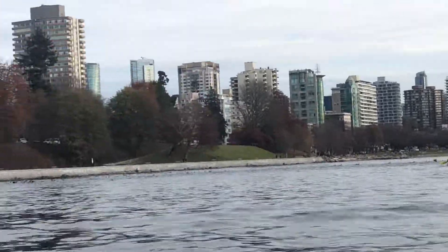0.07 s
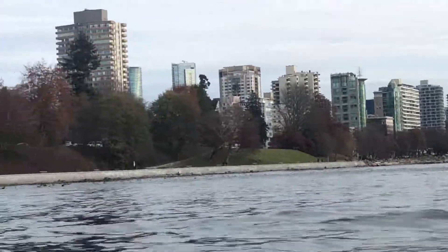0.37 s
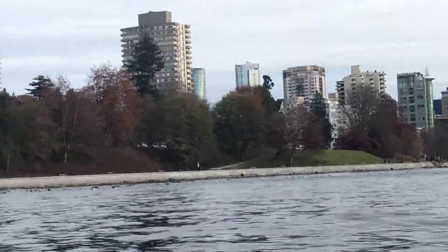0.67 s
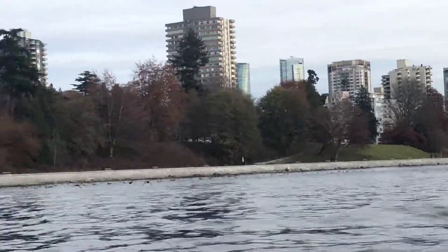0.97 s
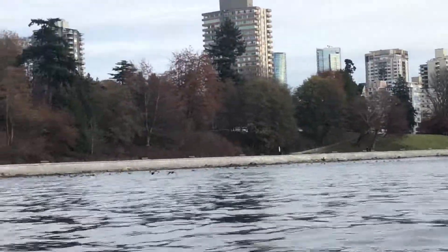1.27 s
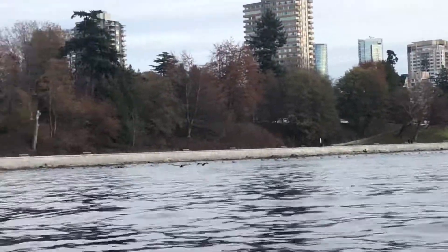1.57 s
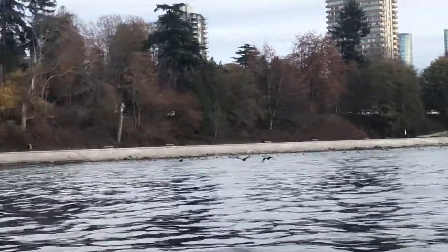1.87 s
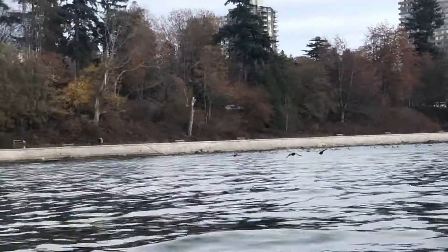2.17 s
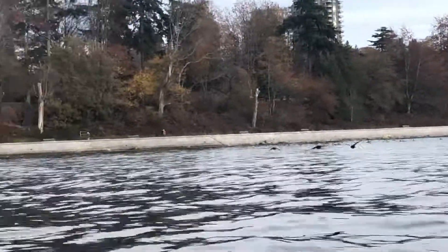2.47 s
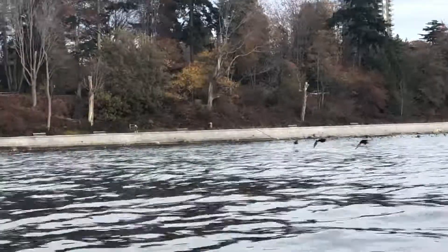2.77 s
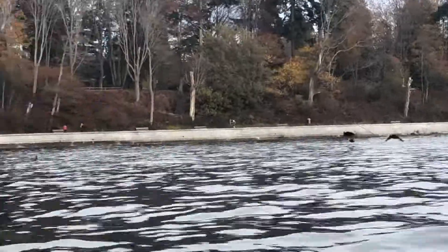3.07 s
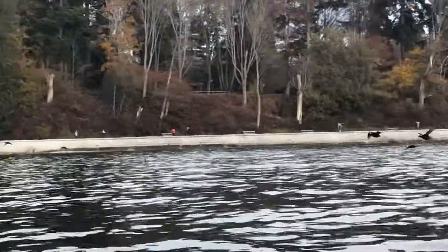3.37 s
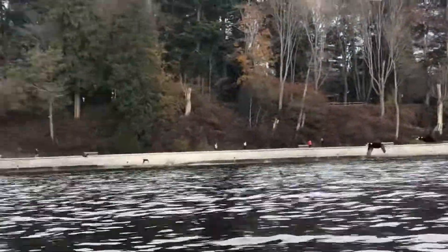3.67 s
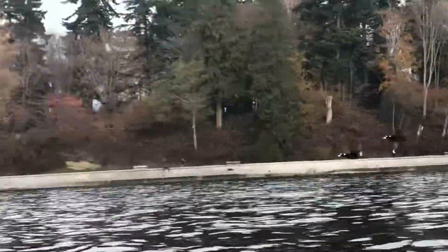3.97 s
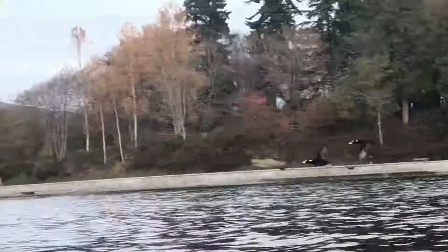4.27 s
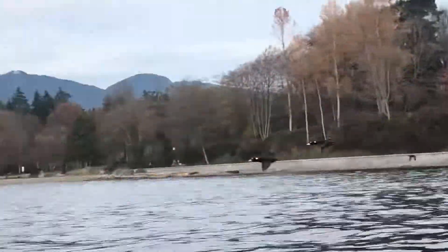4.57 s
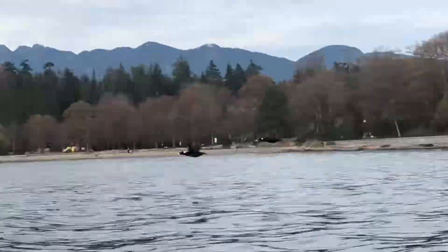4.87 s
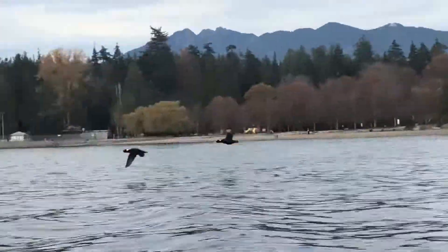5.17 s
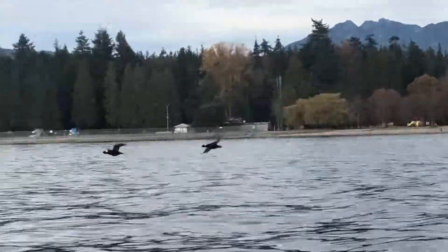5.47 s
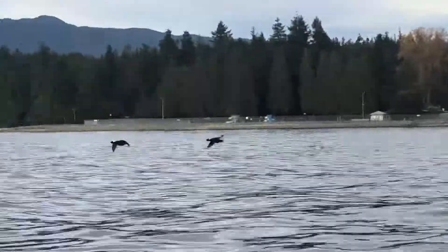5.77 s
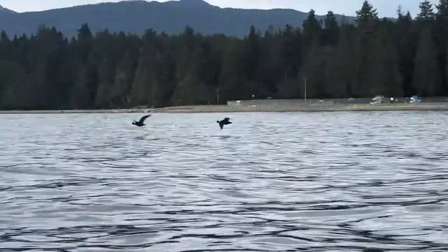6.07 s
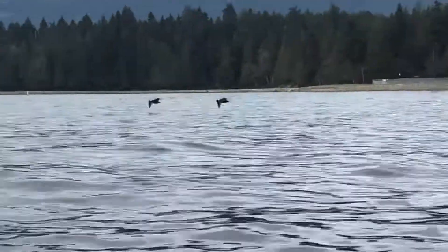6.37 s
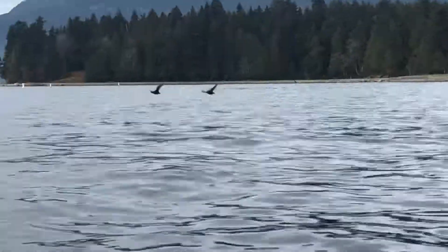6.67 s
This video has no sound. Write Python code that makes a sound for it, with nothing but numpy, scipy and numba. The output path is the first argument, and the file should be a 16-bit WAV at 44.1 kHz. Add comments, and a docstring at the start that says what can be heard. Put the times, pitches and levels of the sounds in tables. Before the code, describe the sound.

Heard from a small boat on open water, a low idling engine throb and rumble run under gentle sloshing waves. At the start come the quick, thin wing whistles of two ducks, the nearer fading first and the fainter one trailing off after it. Hollow gulps and small splashes sound by the hull, then a far motor's steady hum swells. A brief close swish of fabric with a small squeak comes just before the end.

```python
"""Whistling wings and a throbbing engine come first: sea ducks fly low past a small idling boat.
Their feathers whistle on every downstroke and fade away, while the engine slows a little.
A far motor drones in across the bay. Water washes, gulps and ticks near the hull.
Near the end something close by, probably a waterproof sleeve, swishes with a small squeak."""
import sys
import numpy as np
from scipy import signal
from scipy.fft import rfft, irfft
from scipy.io import wavfile
from scipy.ndimage import uniform_filter1d
from numba import njit

SR = 44100
rng = np.random.default_rng(int(sys.argv[2]) if len(sys.argv) > 2 else 0)


def unload_wav(signal):
    """Save mono or channel-first audio to the path in sys.argv[1] as 16-bit WAV at rate SR, clipped to [-1, 1]."""
    wavfile.write(
        sys.argv[1],
        SR,
        np.round(np.clip(np.atleast_2d(signal).T, -1, 1) * 32767).astype(np.int16),
    )


N = 304731
TIME = np.arange(N) / SR


def undb(db):
    """Turn decibels into a number to multiply by."""
    return 10 ** (np.asarray(db) / 20)


def unit(x):
    """Scale a signal to an average strength (rms) of one."""
    return x / np.sqrt(np.mean(x ** 2))


def curves(table):
    """Join rows of (t/s, values...) with straight lines, one curve for each column of values."""
    times, *columns = np.transpose(table)
    return [np.interp(TIME, times, column) for column in columns]


def wander(per_second):
    """A random wobble: pick new values at this rate and smooth them twice."""
    hold = max(int(SR / per_second), 1)
    steps = np.repeat(rng.standard_normal(N // hold + 1), hold)
    return unit(uniform_filter1d(uniform_filter1d(steps, hold), hold)[:N])


def coloured(x, colour):
    """Shape a sound's lows and highs with rows of (f/Hz, relative level/dB)."""
    hz, db = np.transpose(colour)
    f = np.maximum(np.fft.rfftfreq(N, 1 / SR), 1)
    gain = undb(np.interp(np.log(f), np.log(hz), db))
    return unit(irfft(rfft(x) * gain, N))


@njit
def resonate(x, hz, width_hz):
    """A band-pass filter: it keeps the sound near a frequency that may move."""
    out, band_state, low_state = np.empty(len(x)), 0., 0.
    for i in range(len(x)):
        g, damping = np.tan(np.pi * hz[i] / SR), width_hz / hz[i]
        v = (band_state + g * (x[i] - low_state)) / (1 + g * (g + damping))
        band_state, low_state = 2 * v - band_state, low_state + 2 * g * v
        out[i] = damping * v
    return out


def noise_band(hz, width_hz, samples=N):
    """Noise around one frequency, filtered twice for steep sides."""
    centre = np.full(samples, hz, dtype=float)
    once = resonate(rng.standard_normal(samples), centre, float(width_hz))
    return unit(resonate(once, centre, float(width_hz)))


def crackle(per_second, spread_db):
    """Tiny random clicks, most of them faint and a few loud."""
    hits = (rng.random(N) < per_second / SR) * rng.choice([-1, 1], N)
    return hits * undb(spread_db * np.minimum(rng.exponential(size=N), 4))


# how loud the low rumble and the fine hiss are: t/s, relative level/dB
RUMBLE_LEVEL = [(.2, -43), (.6, -39.5), (1.1, -42), (1.55, -40.5), (2.1, -41), (2.9, -43.5), (3.25, -41.5),
                (3.9, -44), (4.4, -44), (5.3, -44), (6.1, -43.5), (6.6, -48)]
HISS_LEVEL = [(0.05, -75.5), (1.37, -79.5), (2.1, -76), (2.44, -81), (2.73, -79.5), (3.0, -75.5),
              (3.26, -71), (3.5, -75), (3.73, -78), (3.96, -75.5), (4.35, -69), (4.72, -73), (5.07, -70),
              (5.2, -74), (5.84, -71.5), (5.98, -74), (6.09, -77.5), (6.24, -70), (6.44, -72),
              (6.69, -69.5), (6.77, -74)]
# their lows and highs: f/Hz, relative level/dB
RUMBLE_COLOUR = [(25, -41), (36, -11), (50, -3.5), (75, 1), (130, 3.5), (200, 1.5), (260, -1), (340, -2),
                 (450, -5.5), (700, -11.5), (1200, -20), (2000, -47.5), (4000, -81)]
HISS_COLOUR = [(1000, -10), (2000, 15), (3000, 10.5), (4500, 9.5), (6000, 6), (8000, 4.5), (9200, 2.5),
               (11500, 1.5), (13200, 0), (14500, 2), (15500, 2)]
def background():
    """A low rumble, small ripples and a thin crackly hiss, later probably rustling clothes."""
    rumble = coloured(rng.standard_normal(N), RUMBLE_COLOUR) * undb(curves(RUMBLE_LEVEL)[0] + 4.5)
    grain = rng.standard_normal(N) + undb(-6.5) * unit(crackle(160, spread_db=4))
    hiss = coloured(grain, HISS_COLOUR) * undb(curves(HISS_LEVEL)[0] + 6.5 + 1.2 * wander(14))
    patter = coloured(crackle(40, spread_db=2.2), [(1000, -8), (2500, 4), (4000, -3), (9000, -19.5)])
    ripples = undb(-69) * (noise_band(2130, width_hz=2700) + undb(-6) * patter)
    return rumble + hiss + ripples


# the far motor's pitch: t/s, f/Hz
MOTOR_PITCH = [(3.4, 95.3), (4.5, 95.1), (6.3, 94.4)]
# its first four harmonics (tones at multiples of the pitch), then the higher ones: t/s, level/dB
MOTOR_FIRST = [(0, -70), (4, -58), (4.65, -36), (5.3, -42.5), (5.7, -37.5), (6.9, -37)]
MOTOR_SECOND = [(0, -73), (3.05, -61), (3.7, -40), (4.1, -41), (4.8, -43.5), (5.2, -39.5), (5.5, -39),
                (5.85, -34), (6.42, -35), (6.9, -49)]
MOTOR_THIRD = [(0, -66), (1.5, -50), (2.9, -52.5), (3.4, -41), (4.6, -45), (6.9, -53.5)]
MOTOR_FOURTH = [(0, -69), (2.4, -59), (2.8, -47.5), (3.3, -52), (3.8, -49), (4.35, -43), (4.9, -66),
                (5.5, -46), (6.1, -55)]
MOTOR_HIGHER = [(0, -59), (2.6, -58), (3.15, -51), (3.6, -55.5), (4.0, -47.5), (4.4, -46), (4.85, -59),
                (5.55, -55), (6.35, -53.5), (6.9, -60)]
# the mix of those higher harmonics: multiple of the pitch, relative level/dB
MOTOR_HIGHER_MIX = [(5, 0), (6, -5.5), (7, -9.5), (8, -16)]
def far_motor(waver_db=1.5):
    """A far motor runs at a nearly steady speed; its tones waver on their way over the water."""
    hz = curves(MOTOR_PITCH)[0] * (1 + .001 * wander(.99))
    phase = 2 * np.pi * np.cumsum(hz) / SR
    low = sum(undb(curves(level)[0] + waver_db * wander(5.8)) * np.sin(k * phase + .11 * wander(2.27))
              for k, level in enumerate((MOTOR_FIRST, MOTOR_SECOND, MOTOR_THIRD, MOTOR_FOURTH), 1))
    high = sum(undb(db + 1.2 * wander(2.54)) * np.sin(k * phase + .087 * wander(5))
               for k, db in MOTOR_HIGHER_MIX)
    return np.sqrt(2) * (low + undb(curves(MOTOR_HIGHER)[0]) * high)


# the steady wash between waves: t/s, level/dB
WASH_LEVEL = [(0, -60), (1.5, -52), (3, -53), (6.9, -49.5)]
# the lows and highs of its foam: f/Hz, relative level/dB
WASH_COLOUR = [(400, -2.5), (700, -8), (950, 3), (1150, 3.5), (1350, -1.5), (1600, -4.5), (1800, -11.5),
               (2100, -18), (2800, -47), (5000, -62)]
# sloshing waves: middle t/s, length/s, start f/Hz, end f/Hz, bubble level/dB, foam level/dB
WAVES = [(.56, 0.81, 1270, 1195, -50, -47.5), (1.12, 0.43, 1110, 1220, -52, -51.5),
         (1.752, 0.14, 1020, 1250, -46, -58), (1.87, 0.11, 1400, 1480, -54, -59),
         (2.075, 0.3, 1290, 1120, -49.5, -48.5), (2.55, 0.68, 1360, 1160, -51.5, -48.5),
         (3.246, 0.24, 1080, 920, -44, -66), (3.46, 0.25, 914, 994, -43, -62),
         (3.822, 0.22, 1500, 1360, -53, -53), (3.947, 0.32, 1120, 950, -48, -64),
         (4.21, 0.41, 1150, 1040, -56.5, -50.5), (4.547, 0.098, 1440, 1450, -53, -64),
         (4.836, 0.33, 1100, 1280, -49.5, -47), (5.035, 0.32, 1300, 1310, -48, -56),
         (5.412, 0.52, 1470, 1550, -53, -51), (5.834, 0.31, 1390, 1410, -47, -43),
         (6.353, 0.8, 1260, 1090, -65, -50)]
def waves(flicker_db=1.8, churn_db=1.32):
    """Each wave swells the foam and folds in ringing bubbles, whose pitch glides as they change size."""
    bubbles, foam_power = np.zeros(N), undb(curves(WASH_LEVEL)[0]) ** 2
    for middle, length, start_hz, end_hz, bubble_db, foam_db in WAVES:
        at = np.flatnonzero(np.abs(TIME - middle) < 1.2 * length)
        progress = (TIME[at] - middle) / length
        swell = np.exp(-3 * progress ** 2)
        hz = np.interp(progress, [-.5, .5], [start_hz, end_hz])
        bubbles[at] += noise_band(hz, width_hz=290, samples=len(at)) * undb(bubble_db) * swell
        foam_power[at] += (undb(foam_db) * swell) ** 2
    fizz = rng.standard_normal(N) + undb(-5.5) * unit(crackle(500, spread_db=2.5))
    foam = coloured(fizz, WASH_COLOUR) * np.sqrt(foam_power)
    return bubbles * undb(flicker_db * wander(70)) + foam * undb(churn_db * wander(35))


# hollow gulps: middle t/s, length/s, f/Hz, level/dB
GULPS = [(.62, 0.4, 385, -42), (1.36, 0.51, 584, -49.5), (1.6, 0.42, 440, -42.5), (3.196, .2, 420, -42.5)]
def gulps():
    """Big pockets of air ring low as a wave runs under the hull."""
    return sum(undb(db) * np.exp(-3 * ((TIME - middle) / length) ** 2) * noise_band(hz, width_hz=270)
               for middle, length, hz, db in GULPS)


# ticks of water: t/s, relative level/dB, f/Hz, relative spray level/dB
SPLASHES = [(1.538, -55.5, 2500, -32), (1.6822, -64, 2200, -25), (1.8538, -62, 2400, -22),
            (2.0469, -66, 2900, -25), (2.0627, -53.5, 2800, -5), (2.341, -62, 3000, -25),
            (2.4894, -64, 2300, -25), (2.5351, -58.5, 3300, -16), (2.598, -56, 3200, -16),
            (2.6565, -65, 2300, -25), (2.7797, -61, 2200, -28), (2.8474, -62, 2500, -23),
            (2.9403, -64, 2200, -23), (2.9718, -51.5, 2100, -14), (3.062, -54, 2600, -25),
            (3.0734, -60, 2500, -20), (3.256, -58, 3400, -24), (3.274, -52.5, 3100, -19),
            (4.1629, -58.5, 2700, -19)]
def splashes(attack_s=.00016, decay_s=.0055):
    """Each small splash is a quick burst of noise with its own pitch and a little bright spray."""
    body, spray = np.zeros(N), np.zeros(N)
    for start, db, hz, spray_db in SPLASHES:
        at = np.flatnonzero((TIME > start) & (TIME < start + .06))
        age = TIME[at] - start
        burst = undb(db) * np.exp(-age / decay_s) * (1 - np.exp(-age / attack_s))
        body[at] += burst * noise_band(hz, width_hz=2300)[at]
        spray[at] += burst * undb(spray_db)
    return undb(3.5) * body + undb(-2) * spray * noise_band(7500, width_hz=5000)


def droplets(spread_s=.06):
    """Fine droplets patter around each of the splashes above."""
    cloud = sum(undb(db - 29) * np.exp(-((TIME - t) / spread_s) ** 2) for t, db, *_ in SPLASHES)
    colour = [(1000, -7), (2500, -3), (4500, -4), (8000, -17), (15000, -13)]
    return cloud * coloured(crackle(60, spread_db=4.6), colour)


# short blips in the wash: t/s, relative level/dB, starting f/Hz
BLIPS = [(1.356, -44, 657), (1.663, -32, 665), (5.13, -32, 1280), (5.883, -25, 1240)]
def blips(attack_s=.0005, decay_s=.0046, rise_per_s=3):
    """Very short, faint tonal blips sound in the wash, each rising a little in pitch."""
    out = np.zeros(N)
    for start, db, hz in BLIPS:
        at = np.flatnonzero((TIME > start) & (TIME < start + .06))
        age = TIME[at] - start
        loudness = undb(db - 1.5) * (1 - np.exp(-age / attack_s)) * np.exp(-age / decay_s)
        out[at] += loudness * np.sin(2 * np.pi * hz * age * (1 + rise_per_s * age / 2))
    return out


# thin dry clicks: t/s, relative level/dB, f/Hz
CLICKS = [(.428, -50, 7000), (1.384, -52, 13500), (1.983, -55, 9000), (2.117, -50, 10000),
          (2.255, -52, 10500), (3.180, -48, 8000), (3.596, -57, 14500), (5.194, -46, 14500)]
def clicks(decay_s=.00075):
    """Very short bursts of high noise sound like dry clicks."""
    out = np.zeros(N)
    for start, db, hz in CLICKS:
        burst = (TIME > start) * np.exp(-np.abs(TIME - start) / decay_s)
        out += undb(db - 4.5) * burst * noise_band(hz, width_hz=7000)
    return out


# the engine's low throb, exhaust note and rough buzz: multiple of the cycle rate, relative level/dB
THROB_TONES = [(4, -28), (6, -9.5), (7, -33), (8, -9), (10, -5), (11, -1.5)]
EXHAUST_TONES = [(12, -5), (13, -1.5), (14, 0), (15, -11.5), (16, -13.5), (18, -9)]
BUZZ_TONES = [(24, 1), (26, 0.5), (28, -2.5), (35, -6), (37, -1.5)]
# how loud each is: t/s, throb level/dB, exhaust level/dB, buzz level/dB
ENGINE_LEVELS = [(0, -41.5, -39, -49), (1.0, -42.5, -37.5, -48), (2.15, -49.5, -36.5, -52),
                 (2.5, -40.5, -43.5, -50), (3.6, -40, -39.5, -44.5), (5.2, -39.5, -37, -44.5),
                 (6.0, -47, -43.5, -48), (6.9, -39.5, -42, -47)]
def boat_engine(start_hz=10.335, slowing_hz_per_s=.0755):
    """Unequal cylinders make tones at many multiples of the cycle rate, which beat into a throb."""
    cycle = 2 * np.pi * np.cumsum(start_hz - slowing_hz_per_s * TIME) / SR + .028 * wander(5)
    out = np.zeros(N)
    for tones, level_db in zip((THROB_TONES, EXHAUST_TONES, BUZZ_TONES), curves(ENGINE_LEVELS)):
        note = sum(undb(db + .29 * wander(2.5)) * np.sin(k * cycle + 1.36 * rng.standard_normal())
                   for k, db in tones)
        out += unit(note) * undb(level_db)
    return out


# swishes of cloth: middle t/s, length/s, level/dB
SWISHES = [(6.565, 0.053, -52), (6.653, 0.042, -54.5)]
# their lows and highs: f/Hz, relative level/dB
SWISH_COLOUR = [(1000, 1), (2000, 2.5), (2800, 0), (3700, -2), (4050, -5), (4350, 2.5), (4650, -9),
                (4950, -1.5), (5400, -11), (6000, -10), (8500, -17), (13000, -20), (15300, -19)]
# the squeak in the second swish: t/s, f/Hz, level/dB
SQUEAK = [(6.615, 3000, -90), (6.629, 2860, -61), (6.636, 2670, -48), (6.641, 2580, -45.5),
          (6.649, 2530, -49), (6.665, 2520, -90)]
def sleeve():
    """Smooth cloth slides twice, finely crackling, and catches once with a falling squeak."""
    slide = sum(undb(db) * np.exp(-((TIME - middle) / length) ** 2) for middle, length, db in SWISHES)
    rub = coloured(rng.standard_normal(N) + undb(-9) * unit(crackle(600, spread_db=3)), SWISH_COLOUR)
    hz, db = curves(SQUEAK)
    phase = 2 * np.pi * np.cumsum(hz * (1 + .022 * wander(900))) / SR
    squeak = undb(db) * (np.sin(phase) + undb(-9) * np.sin(2 * phase))
    catching = (TIME > SQUEAK[0][0]) & (TIME < SQUEAK[-1][0])
    return slide * rub + catching * squeak


def wing_flicks(first_s=3.573, beat_s=.112, length_s=.011, fade_db_per_s=5):
    """Air rushes briefly through the feathers, once a wingbeat for six beats."""
    puffs = sum(undb(-68.5 - fade_db_per_s * age) * np.exp(-((TIME - first_s - age) / length_s) ** 2)
                for age in beat_s * np.arange(6))
    return puffs * noise_band(5600, width_hz=1100)


# how fast the farther duck flaps: t/s, wingbeat rate/Hz
FAR_FLAP_RATE = [(0, 9.6), (.55, 8.9), (.85, 9.1), (1.05, 10.38), (2.7, 10.1), (3.16, 9.6)]
# its whistle: t/s, f/Hz, relative level/dB
FAR_WHISTLE = [(0, 1185, -67), (.3, 1188, -69), (.55, 1174, -74.5), (.82, 1185, -72.5), (.95, 1190, -68.5),
               (1.13, 1192, -67), (1.3, 1188, -74), (1.8, 1225, -70.5), (2.2, 1246, -67.5),
               (2.45, 1258, -68.5), (2.9, 1270, -67.5), (3.16, 1255, -73)]
def far_strokes(first_s=.062, length_s=.034, dull_db=-4):
    """List the farther duck's short, duller whistles, one a wingbeat, in rows like NEAR_STROKES."""
    hz, db = curves(FAR_WHISTLE)
    beats = np.cumsum(curves(FAR_FLAP_RATE)[0]) / SR
    beats -= np.interp(first_s, TIME, beats)
    new_beat = np.diff(np.floor(beats)) > 0
    middles = np.flatnonzero(new_beat & (TIME[1:] < FAR_WHISTLE[-1][0]))
    return [(TIME[i], length_s, hz[i], db[i], dull_db, dull_db) for i in middles]


def stroke_shape(progress, peak_at=.15, rise=.03, fall=.115, max_drop=.17):
    """Pitch climbs with wing speed, then falls. Progress is -1 to 1 over a stroke; the tail runs on."""
    sag = np.where(progress < peak_at, rise, fall) * (progress - peak_at) ** 2
    bend = 1.006 - max_drop * np.tanh(sag / max_drop)
    onset = 1 / (1 + np.exp(-22 * (progress + .92)))
    tail = undb(-13.5) * np.exp(-1.3 * np.abs(progress - .5))  # sings on weakly as the wing slows
    return bend, onset * np.hypot(np.exp(-1.4 * progress ** 2), tail)


# the tones in a feather's whistle: multiple of the pitch, relative level/dB
FEATHER_TONES = [(1, 12), (2, -8.5), (3, -.5), (4, -13.5), (5, -15), (6, -24), (7, -22.5), (8, -31),
                 (9, -29)]
# a duck's two wings whistle slightly apart: pitch ratio, delay/s, relative level/dB
WING_PAIR = [(1, 0, 0), (.945, .006, -11.5)]
# the nearer duck's downstrokes:
# middle t/s, length/s, f/Hz, relative level/dB, boost of tone 4/dB, boost of higher tones/dB
NEAR_STROKES = [(.022, .044, 1212, -56, 3, 0), (.126, .046, 1206, -56, -2, -1),
                (.232, .052, 1206, -54.5, -1, 0), (.336, .048, 1212, -56.5, 0, 1),
                (.444, .042, 1203, -57.5, -1, 0), (.548, .044, 1188, -55.5, -4, -4),
                (.657, .048, 1184, -58.5, 1, -3), (.767, .04, 1186, -58, 1, -3),
                (.871, .04, 1182, -57.5, 5, -3), (.981, .032, 1187, -57.5, 4, -3),
                (1.09, .03, 1182, -65.5, 1, 0), (1.205, .036, 1186, -66, 4, 0),
                (1.311, .032, 1188, -64, 6, 1), (1.422, .03, 1182, -67.5, 1, -2),
                (1.53, .03, 1172, -71, 1, -2), (1.642, .03, 1166, -70, -2, -4)]
def wing_whistles(rasp_db=3, scatter_db=1.2, twist_db=2.2, echo_s=.001463):
    """Each downstroke sets a feather in each wing whistling, with a rush of air around it."""
    whistle, gust = np.zeros(N), np.zeros(N)
    wavers = [1 + .008 * wander(1200) for _ in WING_PAIR]
    rasps = [rasp_db * wander(700) for _ in FEATHER_TONES]
    for middle, length, hz, db, fourth_db, higher_db in np.vstack([NEAR_STROKES, far_strokes()]):
        offsets, twists = rng.standard_normal((2, len(FEATHER_TONES)))
        for (ratio, delay, wing_db), waver in zip(WING_PAIR, wavers):
            at = np.flatnonzero(np.abs(TIME - middle - delay) < length)
            progress = (TIME[at] - middle - delay) / length * 2
            bend, loudness = stroke_shape(progress)
            swell = undb(db + wing_db + 3) * loudness
            phase = 2 * np.pi * np.cumsum(hz * ratio * waver[at] * bend) / SR
            for (k, tone_db), rasp, offset, twist in zip(FEATHER_TONES, rasps, offsets, twists):
                mix_db = tone_db + fourth_db * (k == 4) + higher_db * (k > 4)
                # the feather twists and flutters, so the mix of its tones shifts
                shift_db = scatter_db * offset + twist_db * twist * progress + rasp[at]
                whistle[at] += swell * undb(mix_db + shift_db) * np.sin(k * phase)
            gust[at] += swell
    air_colour = [(800, -20), (2000, -8), (2800, -3), (3350, 29), (3900, 16), (4700, 18),
                  (6500, 0), (10000, -12), (15000, -22)]
    direct = whistle + undb(-14.5) * gust * coloured(rng.standard_normal(N), air_colour)
    echo = undb(-14) * np.interp(TIME - echo_s, TIME, direct)  # bounces off the water just below
    return direct + echo


def scene():
    """Add background, water, small sounds, engines, sleeve and ducks into one channel."""
    water = waves() + gulps() + splashes() + droplets()
    engines = far_motor() + boat_engine()
    ducks = wing_flicks() + wing_whistles()
    return (background() + water + blips() + clicks() + engines + sleeve() + ducks)[None]


def record(dry):
    """A steep filter cuts the very highest treble, above 15800 Hz."""
    return signal.sosfilt(signal.ellip(10, .1, 80, 15800, fs=SR, output="sos"), dry)


dry = scene()
out = record(dry)
unload_wav(out)
```